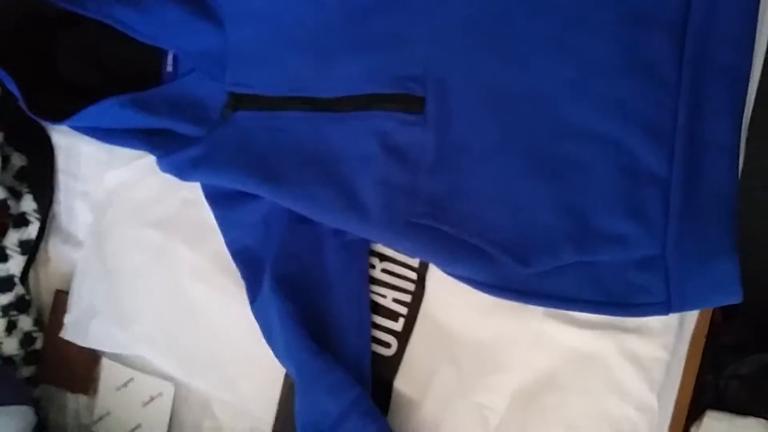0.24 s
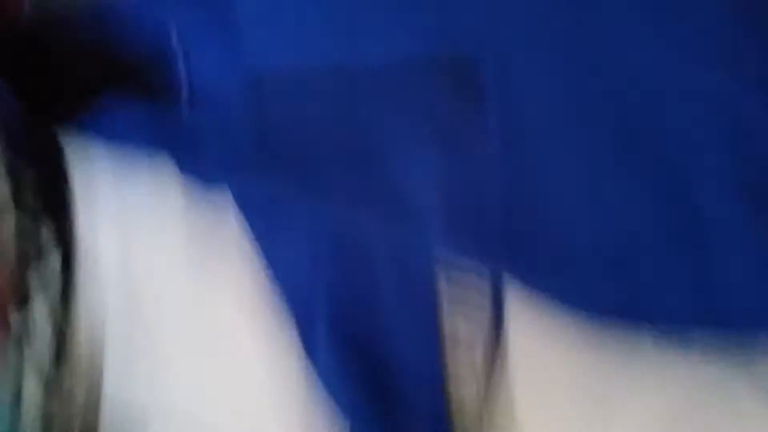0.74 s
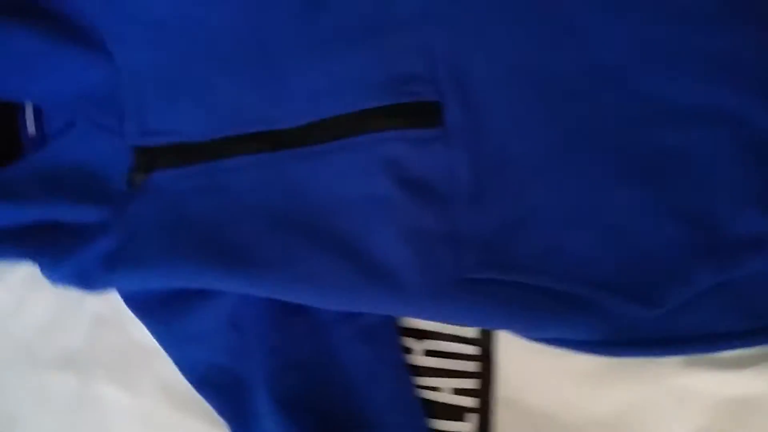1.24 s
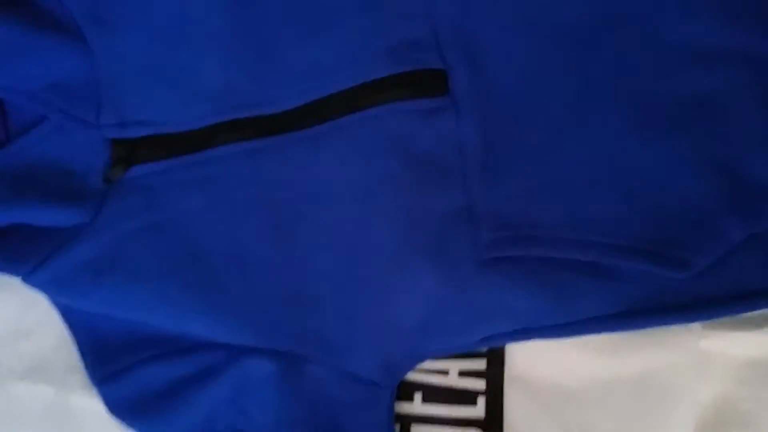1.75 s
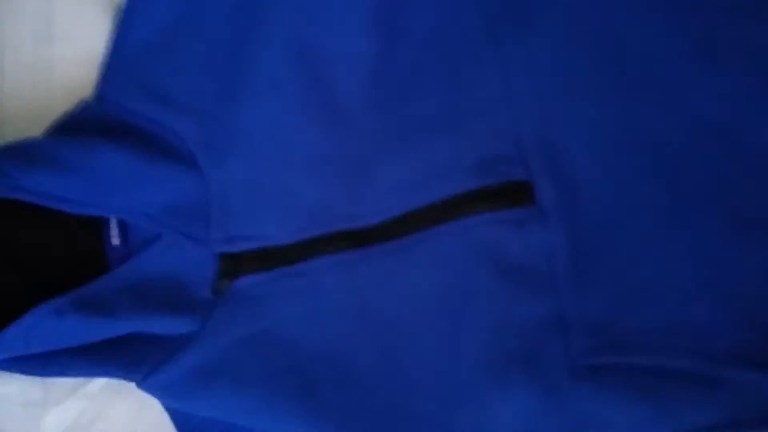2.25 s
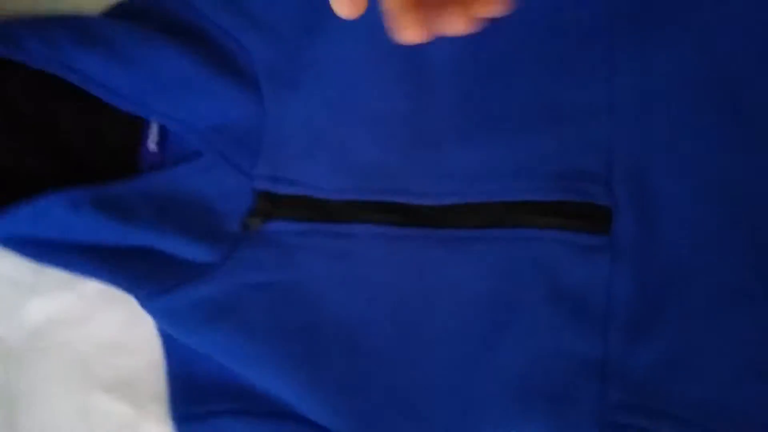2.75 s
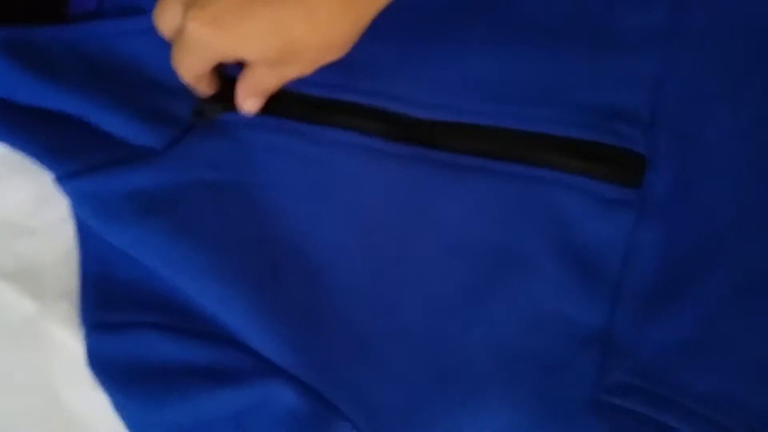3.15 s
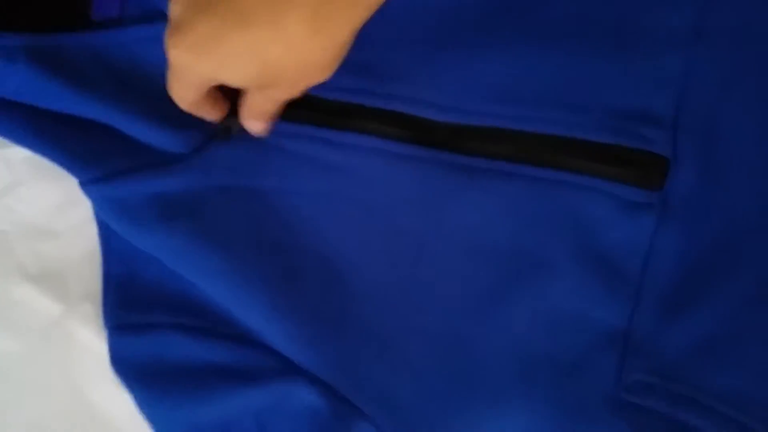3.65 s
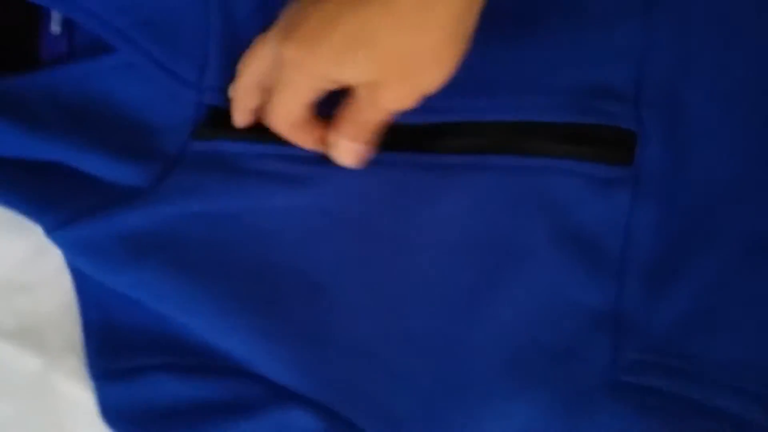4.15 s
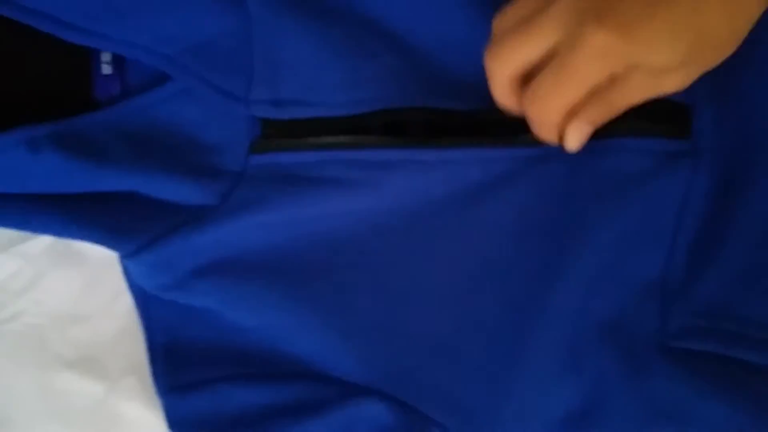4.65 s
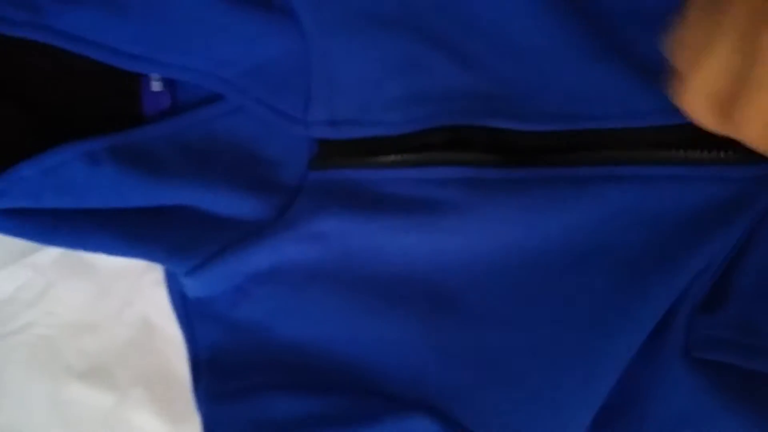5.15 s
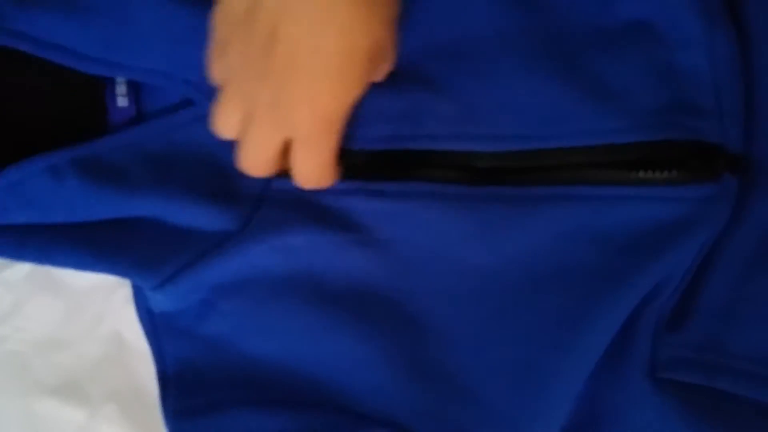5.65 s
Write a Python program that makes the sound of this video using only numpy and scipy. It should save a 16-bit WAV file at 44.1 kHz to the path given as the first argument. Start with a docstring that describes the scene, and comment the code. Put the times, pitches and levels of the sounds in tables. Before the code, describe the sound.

In a quiet small furnished room, a hand shifts its hold on a phone: harsh scratchy rubs and heavy, overloaded knocks right at the microphone, a lull with faint cloth swishes, then a second burst of handling. Afterwards, at arm's length, a short zipper is pulled in several quick raspy strokes with clicks, ending in soft palm brushing over fabric.

```python
"""Phone handling and a short zipper

A phone is shifted between hands over a sweatshirt in a quiet room: skin rubs and knocks on its case.
Then fingers pull the short zipper open in several strokes; the slider rasps tooth by tooth, the tab clicks.
Friction is noise of uneven slips, knocks are pressure pulses with decaying modes, and the zipper is
a train of jolts that excites the slider and the taut cloth, with clicks. Cloth swishes, pats and brushes."""
import sys
import numpy as np
from scipy import signal
from scipy.fft import rfft, irfft
from scipy.io import wavfile
from scipy.ndimage import uniform_filter1d

SR = 44100
rng = np.random.default_rng(int(sys.argv[2]) if len(sys.argv) > 2 else 0)


def put_to_file(sound):
    """Save the sound as 16-bit audio at rate SR, in the file named by the first command-line argument."""
    columns = np.atleast_2d(sound).T  # one column per channel
    safe = np.clip(columns, -1, 1)
    whole_steps = np.round(safe * 32767)
    wavfile.write(sys.argv[1], SR, whole_steps.astype(np.int16))


N = 261072
TIME = np.arange(N) / SR

# spectrum of skin hissing on the case, one per change of hold: rows of (f/Hz, level/dB)
RUB_HISS = [
    [(880, -36.5), (1500, -7), (2230, -5.5), (2410, -6), (3250, -5), (4690, -3.5), (7610, 3.5),
     (10600, -7.5), (12000, -8), (15100, -13), (16000, -20.5)],
    [(880, -31), (1500, -10.5), (1880, -11.5), (2940, -6), (3920, -6), (4160, -5.5), (5020, -6.5),
     (6180, 0), (7610, -1.5), (9650, -9), (10500, -14), (15100, -16.5), (16000, -28)],
]
# spectrum of the taut cloth around the zipper: f/Hz, level/dB
CLOTH = [(45, -15.5), (80, -3.5), (130, -2), (320, -3.5), (450, -6), (650, -10), (800, -19.5), (1100, -14),
         (2500, -57)]


def amp(db):
    """Level in decibels to amplitude ratio."""
    return 10 ** (np.asarray(db) / 20)


def unit(x):
    """Normalisation to rms 1."""
    return x / np.sqrt(np.mean(x ** 2))


def noise():
    """White noise: equal power at all frequencies, rms 1."""
    return rng.standard_normal(N)


def walk(rate):
    """Random modulation: noise averaged twice over 1/rate seconds, rms 1."""
    k = max(int(SR / rate), 2)
    return unit(uniform_filter1d(uniform_filter1d(noise(), k), k))


def colour(x, spectrum):
    """Minimum-phase filtering: the cepstrum turns a (f/Hz, level/dB) shape into a causal, unit-energy response."""
    hz, db = np.transpose(spectrum)
    size = 4096
    log_hz = np.log(np.fft.rfftfreq(size, 1 / SR) + 1)
    shape = amp(np.interp(log_hz, np.log(hz), db))
    cepstrum = irfft(np.log(shape))[:size // 2]
    cepstrum[1:] *= 2  # fold the anticausal half onto the causal one
    response = irfft(np.exp(rfft(cepstrum, size)))
    return signal.fftconvolve(x, response / np.linalg.norm(response))[:N]


def friction(spectrum, grain_db, flutter_db, flutter_rate):
    """Stick-slip friction: countless tiny slips of uneven size, bunching as the contact grips and lets go."""
    slip_size = amp(grain_db * noise() + flutter_db * walk(flutter_rate))
    return colour(unit(noise() * slip_size), spectrum)


def stroke(start_s, length_s, attack_s, release_s):
    """Envelope of one hand movement: linear rise, hold to the end of its length, exponential decay."""
    t = TIME - start_s
    rise = np.clip(t / attack_s, 0, 1)
    return rise * np.exp(-np.clip((t - length_s) / release_s, 0, 20))


def ring(modes, t, alternate=False):
    """Modal decay after one blow, peak 1: each mode's bandwidth sets its damping."""
    y = np.zeros(len(t))
    for k, (hz, width_hz, db) in enumerate(modes):
        sign = (-1) ** (k * alternate)  # neighbours in opposite phase make the ring build up
        y += sign * amp(db) * np.exp(-np.pi * width_hz * t) * np.sin(2 * np.pi * hz * t)
    return y / np.abs(y).max()


def resonate(x, hz, width_hz):
    """Second-order resonance: gain 1 at its centre, falling on either side."""
    return signal.lfilter(*signal.iirpeak(hz, hz / width_hz, SR), x)


def add(out, s, x):
    """Superposition: mix x into out from time s."""
    i = int(s * SR)
    out[i:i + len(x)] += x[:N - i]


def room_noise():
    """Coloured noise: background noise of fixed spectrum whose level sinks, swells and settles."""
    # level of the room noise: t/s, level/dB
    room_level = [(0, -64), (.6, -64), (1.05, -66.5), (1.3, -71), (1.65, -68.5), (2.0, -65), (2.9, -57.5),
                  (3.3, -63.5), (5.92, -61)]
    # spectrum of the room noise: f/Hz, level/dB
    room_colour = [(18, -53), (30, -16.5), (43, -1.5), (81, -2), (204, -9.5), (233, -9), (473, -9.5),
                   (540, -12.5), (702, -16), (1960, -22.5), (4300, -21.5), (7870, -24), (14800, -25.5),
                   (16000, -30.5)]
    level = amp(np.interp(TIME, *np.transpose(room_level)))
    return level * friction(room_colour, grain_db=0.4, flutter_db=-0.1, flutter_rate=9)


def rubbing(attack_share=.32, release_share=.14):
    """Sliding friction: skin hisses over the case, judders where it grips, and rocks the phone."""
    # slides of skin, one list per change of hold:
    # start t/s, length t/s, hiss level/dB, gripping judder level/dB, rumble level/dB
    rubs = [
        [(.465, 0.157, -62, -60.5, -62.5), (.62, 0.084, -49, -49, -49), (.675, 0.034, -37, -42.5, -43.5),
         (.705, 0.073, -44.5, -51, -36.5), (.77, 0.081, -46.5, -53.5, -58), (.82, .016, -33, -30, -45),
         (.83, 0.091, -54.5, -51.5, -43), (.91, 0.07, -47, -61.5, -67), (.98, 0.058, -58.5, -73.5, -70.5)],
        [(2.02, 0.18, -50, -63, -66), (2.135, 0.055, -43.5, -55, -53.5), (2.18, 0.076, -43, -57, -52.5),
         (2.262, 0.17, -47.5, -56.5, -59), (2.4, .15, -47.5, -49, -48), (2.473, 0.03, -44, -46, -49),
         (2.556, 0.025, -34, -30, -39.5), (2.58, 0.048, -46, -48.5, -50), (2.64, .09, -61.5, -62, -53.5)],
    ]
    # spectrum of the judder: f/Hz, level/dB
    judder_colour = [(150, -32), (250, 2), (946, -1.5), (1220, -2.5), (1410, -3.5), (1980, -6), (2230, -10),
                     (2490, -5), (4500, -12.5), (5850, -41), (9900, -120)]
    # spectrum of the rumble: f/Hz, level/dB
    rumble_colour = [(21, -34.5), (35, -3.5), (70, -6), (109, -4), (143, -5), (215, -16.5), (400, -23.5),
                     (520, -51), (880, -120)]
    out = np.zeros(N)
    for slides, hiss_colour in zip(rubs, RUB_HISS):
        power = np.zeros((3, N))  # overlapping slides add in power
        for s, length_s, *levels_db in slides:
            # long slides start and end gently
            envelope = stroke(s, length_s, attack_share * length_s, release_share * length_s)
            power += np.outer(amp(levels_db), envelope) ** 2
        hiss, judder, rumble = np.sqrt(power)
        out += hiss * friction(hiss_colour, grain_db=2.5, flutter_db=2.0, flutter_rate=350)
        out += judder * friction(judder_colour, grain_db=3.5, flutter_db=2.5, flutter_rate=350)
        out += rumble * friction(rumble_colour, grain_db=2.0, flutter_db=2.0, flutter_rate=40)
    return out


def knocks(detune=0.011, rebound=0.37, scuff_db=-9.5, scuff_s=.001, uneven=.15, count=4):
    """Impact excitation: each contact is a pressure pulse, case ring, duct tick and scuff of skin."""
    # fingers knock on the phone: t/s, thump level/dB, first contact t/s, case ring level/dB,
    # sharp tick level/dB, change per bounce level/dB
    blows = [(0.588, -62, .0004, -35, -42.5, -16), (.651, -5.5, .00014, -16, -10, -12.5),
             (0.6553, -12.5, 0.00054, -21, -19.5, -9), (0.7103, -25.5, 0.00094, -24, -22, -22),
             (.8708, -13, .00004, -19.5, -26, -30), (0.8717, -1.5, .00048, -17.5, 8.5, -44),
             (0.904, -34, 0.0011, -29, -23, -4.5), (1.135, -65, .0005, -62, -48.5, -19),
             (1.731, -73.5, .0005, -56.5, -39, -19), (2.0272, -57, .0005, -62.5, -40.5, -19),
             (2.156, -43, 0.0013, -41, -35, -18), (2.275, -60, 0.00042, -36.5, -37, -18),
             (2.4438, -13.5, .00066, -29, -28.5, -23), (2.5251, -17, 0.00068, -22, -20.5, -19.5),
             (2.5717, -8.5, 0.00058, -11, -15, -16.5), (2.5783, -25, 0.00043, -5, -13.5, -9),
             (2.5823, -16, 0.0016, -36, -32, -16)]
    # modes of the phone's case: f/Hz, bandwidth f/Hz, level/dB
    case_modes = [(515, 150, -6.5), (830, 190, -4.5), (1140, 100, -3), (1636, 120, -7.5), (1910, 450, -4),
                  (2917, 340, -17)]
    # modes of its microphone duct: f/Hz, bandwidth f/Hz, level/dB
    duct_modes = [(2000, 1100, -15), (3100, 350, -21.5), (4290, 650, -4), (5500, 450, -12),
                  (6880, 440, -0.5), (7850, 500, -5), (8550, 510, -15.5), (9400, 500, -12.5),
                  (10570, 990, -12.5), (14700, 1400, -15)]
    bounce_s, softening = .0022, 1.6  # mean bounce interval; each contact is longer by this factor
    lead_s = .012  # room for the rise of the pulse before its peak
    out, scuffs, t = np.zeros(N), np.zeros(N), TIME[:SR // 20]
    for s, thump_db, contact_s, case_db, tick_db, bounce_db in blows:
        for k in range(count):
            grip = 1 + detune * rng.uniform(-1, 1)  # the fingers load the case differently each time
            strength = amp(k * bounce_db)
            push = ((t - lead_s) / (contact_s * softening ** k)) ** 2
            pulse = (rebound * push - 1) * np.exp(-.5 * push)
            add(out, s - lead_s, strength * amp(thump_db) * pulse)
            case = amp(case_db) * ring(case_modes, t * grip)
            tick = amp(tick_db) * ring(duct_modes, t, alternate=True)
            add(out, s, strength * (case + tick))
            scuff = np.exp(-t / scuff_s) * rng.standard_normal(len(t))
            add(scuffs, s, strength * amp(tick_db + scuff_db) * scuff)
            s = s + bounce_s * (1 + uneven * rng.uniform(-1, 1))
    return out + colour(scuffs, RUB_HISS[0])


def swishes():
    """Fibre friction: brief swells of noise from clothing."""
    # soft swishes of clothing: start t/s, length t/s, level/dB
    swells = [(1.088, 0.094, -69.5), (1.417, .073, -58), (1.464, 0.079, -60.5), (1.693, 0.1, -58),
              (1.8, 0.1017, -69.5)]
    # spectrum of the swish: f/Hz, level/dB
    swish_colour = [(590, -35), (1000, -5.5), (1240, -16), (2350, -2.5), (2550, -11.5), (3750, -13),
                    (6100, -0.5), (6840, -10.5), (9250, -14.5), (12000, -34.5), (15600, -75), (22000, -120)]
    swell = np.zeros(N)
    for s, length_s, db in swells:
        add(swell, s, amp(db) * np.hanning(int(length_s * SR)))
    return swell * friction(swish_colour, grain_db=6.5, flutter_db=2.5, flutter_rate=219)


def tinkles(hz=10100, decay_s=0.0094):
    """Free vibration: the dangling tab gives a tiny, high, decaying tone as the fingers find it."""
    # touches of the tab: t/s, level/dB
    touches = [(3.695, -55), (3.728, -54)]
    out, t = np.zeros(N), TIME[:SR // 10]
    for s, db in touches:
        add(out, s, amp(db) * np.exp(-t / decay_s) * np.sin(2 * np.pi * hz * t))
    return out


def brushing(attack_share=0.31, release_share=0.23):
    """Sliding friction: the palm brushes over the sweatshirt."""
    # strokes of the palm: start t/s, length t/s, level/dB
    brushes = [(3.9, .42, -63), (4.45, 0.056, -63.5), (5.034, 0.204, -65.5), (5.435, 0.343, -60.5)]
    # spectrum of the brushed cloth: f/Hz, level/dB
    brush_colour = [(88, -53), (150, -6.5), (410, 2), (611, -8), (893, -7.5), (1460, -17), (2950, -8.5),
                    (5420, -16), (6550, -16), (14000, -25)]
    palm = np.zeros(N)
    for s, length_s, db in brushes:
        palm += amp(db) * stroke(s, length_s, attack_share * length_s, release_share * length_s)
    return palm * friction(brush_colour, grain_db=4.0, flutter_db=2.5, flutter_rate=76)


def pulling():
    """Kinematics of the slider: speed (teeth per s) glides within a pull; rasp and cloth gains follow it."""
    # pulls of the slider: start t/s, length t/s, rasp attack t/s, initial tooth rate f/Hz,
    # final tooth rate f/Hz, rasp level/dB and taut cloth level/dB at the middle speed, before the zipper's gains
    pulls = [(3.919, 0.074, .006, 84, 96.6, -57, -56), (4.061, 0.074, 0.0023, 169, 101, -46, -43.5),
             (4.15, .134, 0.0041, 105, 190, -49.5, -53.5), (4.337, 0.02, 0.0022, 120, 116, -51, -52),
             (4.558, .072, 0.035, 195, 210, -41, -55), (4.8, 0.041, 0.033, 240, 249, -45.5, -58),
             (4.963, 0.085, .009, 169, 183, -44, -55)]
    rasp_slope_db, cloth_slope_db = 14, 11.5  # per doubling of speed: a faster slider is louder
    rasp_release_s, cloth_release_s = .014, 0.023  # the slider stops; the cloth slackens later
    speed, rasp, cloth = np.zeros((3, N))
    for s, length_s, attack_s, first, last, rasp_db, cloth_db in pulls:
        progress = np.clip((TIME - s) / length_s, 0, 1)
        doublings = np.log2(last / first) * (progress - .5)  # octaves from the middle speed
        speed = np.where(TIME >= s, np.sqrt(first * last) * 2 ** doublings, speed)
        rasp_stroke = stroke(s, length_s, attack_s, rasp_release_s)
        rasp += rasp_stroke * amp(rasp_db + rasp_slope_db * doublings)
        cloth_stroke = stroke(s, length_s, attack_s / 2, cloth_release_s)
        cloth += cloth_stroke * amp(cloth_db + cloth_slope_db * doublings)
    return speed, rasp, cloth


def teeth(speed, jitter=.11, scatter_db=0.9, decay_s=0.0018, scrape=0.273):
    """Pulse-train excitation: a decaying jolt as each tooth parts, over steady scraping; local rms 1."""
    travel = np.cumsum(speed) / SR  # in teeth
    chance = rng.standard_normal((int(travel[-1]), 2))
    at = np.searchsorted(travel, np.arange(len(chance)) + jitter * chance[:, 0])
    jolts = np.zeros(N)
    jolts[np.minimum(at, N - 1)] = amp(scatter_db * chance[:, 1])
    force = signal.lfilter([1], [1, -np.exp(-1 / (decay_s * SR))], jolts) + scrape
    return force / np.sqrt(uniform_filter1d(force ** 2, size=2205))  # rms over 50 ms


def slider(crackle):
    """Forced resonance: the crackle rings in the slider, as the fingers hold it at that moment."""
    # broad spectrum of the crackle: f/Hz, level/dB
    rasp_colour = [(500, -34), (1000, -12), (1500, -13), (2300, -8.5), (3400, -4), (5200, -7.5),
                   (7000, -8.5), (8400, -15.5), (10000, -17), (12500, -19.5), (16000, -22)]
    # resonances change with each new grip: from t/s, rows of (f/Hz, bandwidth f/Hz, boost level/dB)
    grips = [(0, [(1250, 200, 7), (1850, 250, 3), (2800, 400, 5), (3700, 400, 5), (4200, 400, 6),
             (5350, 400, 4), (6600, 600, 7)]), (4.155, [(1230, 200, 9.5), (1800, 230, 8), (2850, 430, 7),
             (3740, 390, 8.5), (6640, 420, 10.5), (7000, 400, 5.5), (9970, 700, 6)]),
             (4.45, [(1221, 200, 6.5), (1900, 247, 6), (3115, 580, 7.5), (4750, 644, 4), (6936, 450, 7.5),
             (8850, 1800, 3)]), (4.75, [(1150, 170, 1.5), (1839, 348, 7.5), (2830, 250, 10), (3260, 330, 4),
             (4500, 400, 1), (5870, 550, 9.5)])]
    out, broad = np.zeros(N), colour(crackle, rasp_colour)
    for s, modes in grips:
        held = broad.copy()
        for hz, width_hz, db in modes:
            held += (amp(db) - 1) * resonate(broad, hz, width_hz)
        out = np.where(TIME >= s, held, out)
    return out


def zipper(rasp_db=-4., click_db=-3.5, cloth_db=-1.5, thud_db=-11.5):
    """Source and resonators: teeth crackle through the slider and shake the cloth; clicks ring the metal tab."""
    # short clicks of the zipper, and late faint ticks as the hand slides over the cloth:
    # t/s, level/dB before the gains below, decay t/s
    clicks = [(3.924, -48.5, 0.00096), (3.935, -44, 0.00103), (4.0444, -33.5, 0.0047),
              (4.0642, -41.5, .0042), (4.1391, -34, 0.0019), (4.1996, -37, 0.0012), (4.235, -31.5, 0.00084),
              (4.295, -33.5, 0.00095), (4.339, -37.5, 0.0018), (4.8116, -42.5, .0012), (4.976, -40.5, .001),
              (5.056, -37.5, .0012), (5.374, -54, 0.00188), (5.682, -50, 0.004)]
    # the released pull tab falls on the slider: t/s, level/dB before the gains, decay t/s, tab drive level/dB
    tab_drops = [(5.2618, -36, .0026, -2.5)]
    click_tab_db = -28  # how much a click drives the pull tab
    speed, rasp, cloth = pulling()
    force = teeth(speed)
    crackle = force * noise() * rasp * amp(rasp_db)
    tab, t = np.zeros(N), TIME[:SR // 20]
    for s, db, decay_s, tab_db in [(*click, click_tab_db) for click in clicks] + tab_drops:
        snap = amp(db) * np.exp(-t / decay_s) * rng.standard_normal(len(t))
        add(crackle, s, snap * amp(click_db))
        add(tab, s, snap * amp(tab_db))
    cloth_force = force * noise() * cloth * amp(cloth_db)
    shaken = colour(cloth_force + amp(thud_db) * crackle, CLOTH)
    tab_ring = amp(13.0) * resonate(tab, hz=10350, width_hz=810)
    return slider(crackle) + tab_ring + shaken


def patting():
    """Damped impact: fingers let go and land on the cloth in short decaying bursts of noise."""
    # pats on the cloth: t/s, level/dB, decay t/s
    pats = [(4.465, -52.5, 0.0036), (4.495, -48, 0.0048), (4.512, -50, 0.00183), (5.326, -58, 0.0026)]
    envelope, t = np.zeros(N), TIME[:SR // 10]
    for s, db, decay_s in pats:
        add(envelope, s, amp(db) * np.exp(-t / decay_s))
    return colour(envelope * noise(), CLOTH)


def walls(x, wet_db, t60_s=0.26):
    """Diffuse reverberation: exponentially decaying noise stands for the echoes of a small furnished room."""
    t = TIME[:SR // 2]
    tail = rng.standard_normal(len(t)) * amp(-60 * t / t60_s) * (t > .005)
    tail = signal.sosfilt(signal.butter(1, 7000, fs=SR, output="sos"), tail)
    return x + amp(wet_db) * signal.fftconvolve(x, tail / np.linalg.norm(tail))[:N]


def scene():
    """Direct-to-reverberant balance: handling right at the microphone, the garment at arm's length, the room."""
    handling = walls(rubbing() + knocks(), wet_db=-35)
    clothing = swishes() + brushing() + patting()
    garment = walls(zipper() + tinkles() + clothing, wet_db=-13.5)
    return (handling + garment + room_noise())[None]


def record(dry, low_cut_hz=52, top_hz=15950):
    """Overload and band limits: peaks clip; the steep bass cut rings after thumps; the top is cut."""
    x = np.clip(dry, -.9, .9)
    x = signal.sosfilt(signal.butter(8, low_cut_hz, "high", fs=SR, output="sos"), x)
    return signal.sosfilt(signal.ellip(10, .2, 70, top_hz, fs=SR, output="sos"), x)


dry = scene()
out = record(dry)
put_to_file(out)
```